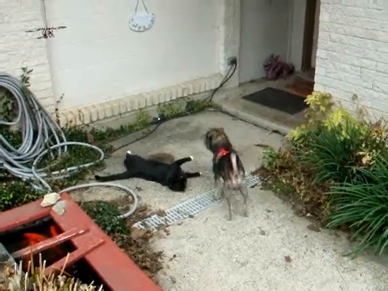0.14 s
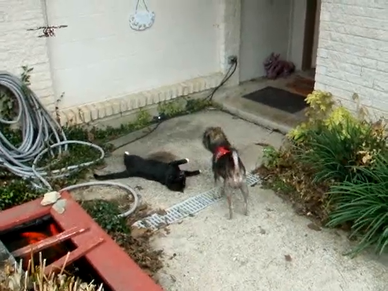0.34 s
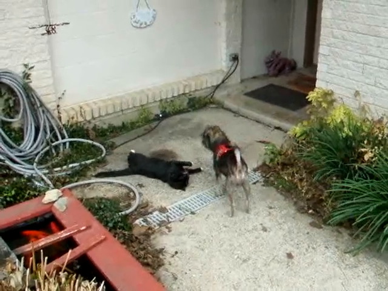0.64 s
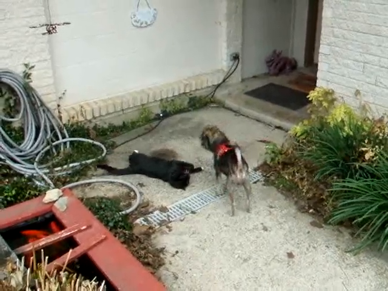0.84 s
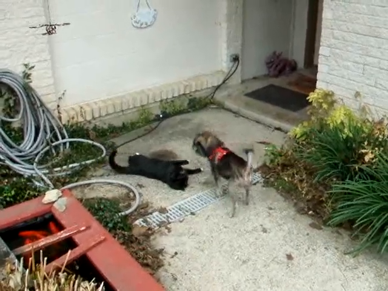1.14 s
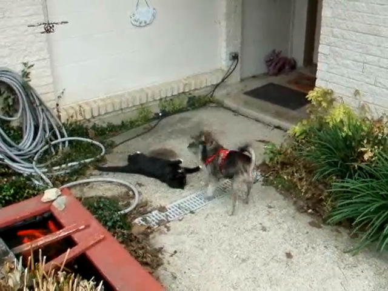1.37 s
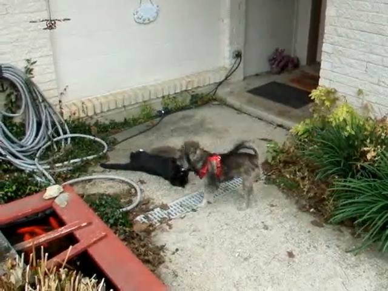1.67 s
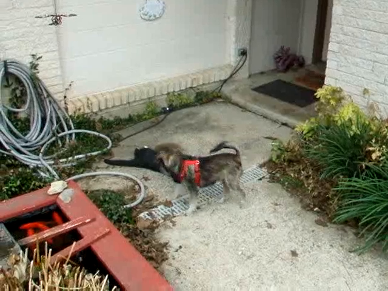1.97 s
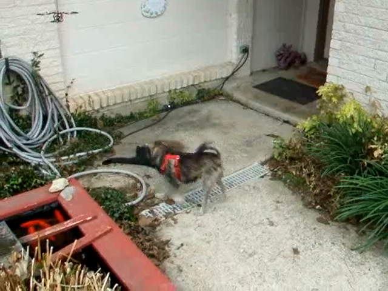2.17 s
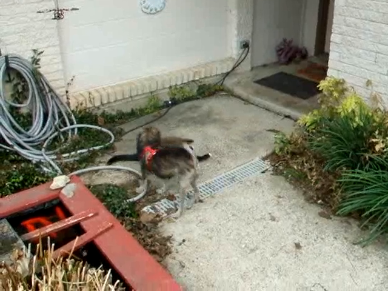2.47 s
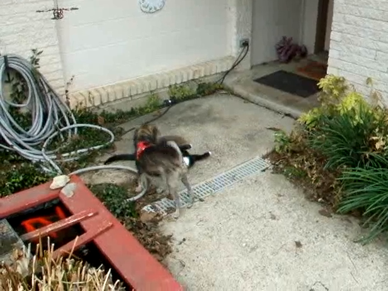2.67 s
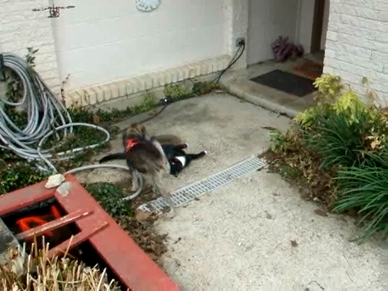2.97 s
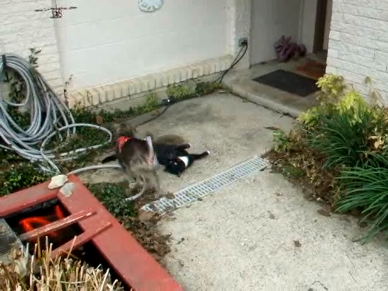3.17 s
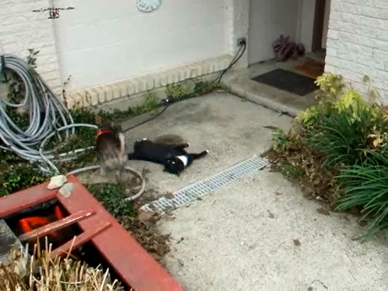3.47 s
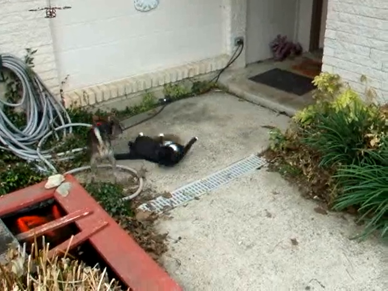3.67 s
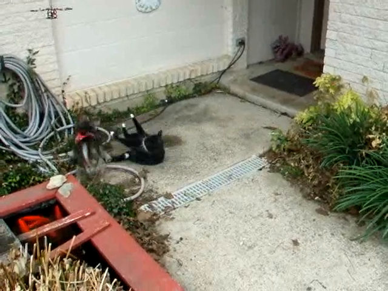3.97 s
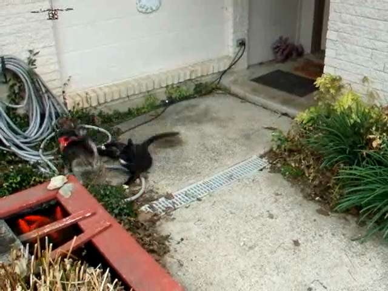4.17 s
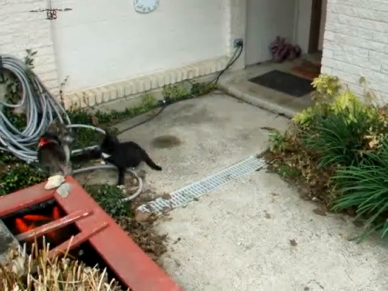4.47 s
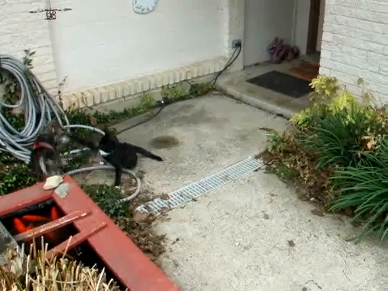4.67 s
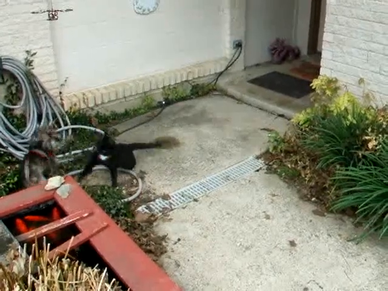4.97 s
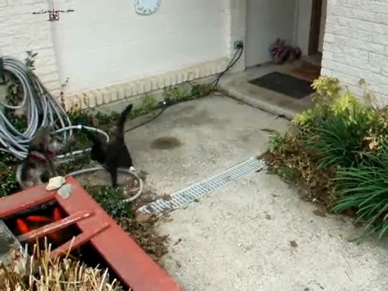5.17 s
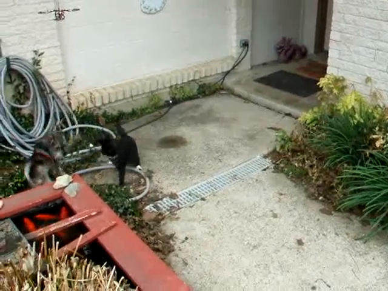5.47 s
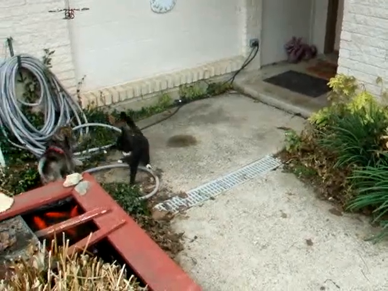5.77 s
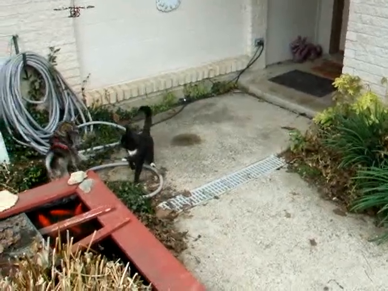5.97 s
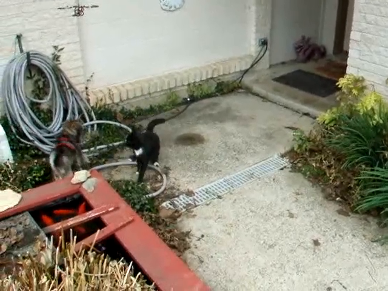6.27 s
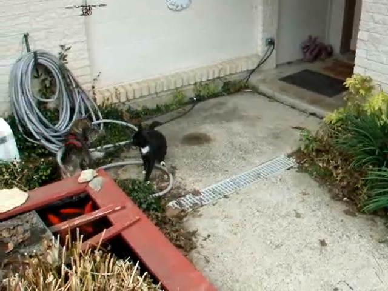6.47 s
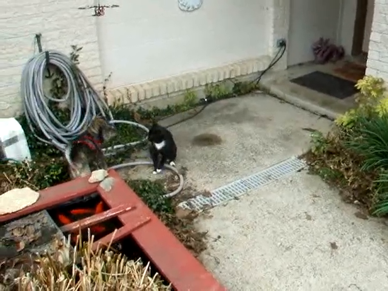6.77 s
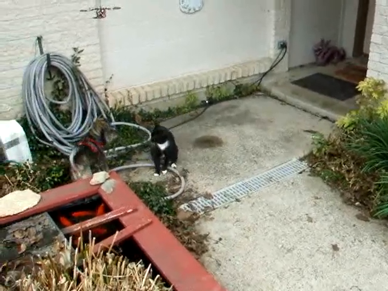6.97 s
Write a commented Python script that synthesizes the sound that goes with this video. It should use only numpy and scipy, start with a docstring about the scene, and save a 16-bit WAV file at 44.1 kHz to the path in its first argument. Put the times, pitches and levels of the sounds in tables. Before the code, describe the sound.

Crisp leaf crunches, rustling and claw taps from pets playing on a patio, with two rising bird whistles and a low traffic hum.

```python
"""Distant traffic and a motor hum are heard first, with leaves stirring on a walled concrete patio.
A small dog and a cat play there: paws tap and scuff, then crunch through dry leaves and low plants,
each crunch a cloud of tiny fractures. A crow caws far off and a bird gives two long rising whistles,
harmonic tones that echo among the houses. There is one soft hoot and there are two short chips.
A far exhaust swells now and then, and at the end a vehicle draws nearer."""
import sys
import numpy as np
from scipy import signal
from scipy.io import wavfile

SR = 44100
rng = np.random.default_rng(int(sys.argv[2]) if len(sys.argv) > 2 else 0)


def file_out(sig):
    """Save sig as 16-bit WAV at sys.argv[1]."""
    # one column per channel
    cols = np.atleast_2d(sig).T
    # limit, then scale
    lim = np.clip(cols, -1, 1)
    pcm = np.round(lim * 32767).astype(np.int16)
    wavfile.write(sys.argv[1], SR, pcm)


N = 314212
TIME = np.arange(N) / SR


def from_db(db):
    """Amplitude grows tenfold for every 20 dB."""
    return 10 ** (np.asarray(db) / 20)


def unit_power(x):
    """Normalisation by the root mean square."""
    return x / np.sqrt(np.mean(x ** 2) + 1e-20)


def curve(rows):
    """Linear interpolation of (time_s, value) rows at every sample."""
    return np.interp(TIME, *np.transpose(rows))


def swell(centre_s, db, half_length_s):
    """Gaussian envelope: the gain is 1/e of its peak one half length from the centre."""
    return from_db(db) * np.exp(-np.minimum(((TIME - centre_s) / half_length_s) ** 2, 20))


def burst(peak_s, db, rise_s, decay_s):
    """Transient envelope: exponential growth to a peak, then exponential decay."""
    fall = np.maximum(2 * (peak_s - TIME) / rise_s, (TIME - peak_s) / decay_s)
    return from_db(db) * np.exp(-np.minimum(fall, 20))


def drift(rate_hz):
    """Random modulation: low-passed noise of unit power, computed at every 40th sample."""
    pole = np.exp(-2 * np.pi * rate_hz * 40 / SR)
    white = rng.standard_normal(N // 40 + 2002)
    slow = signal.lfilter([1], [1, -2 * pole, pole * pole], white)[2000:]
    return np.interp(np.arange(N) / 40, np.arange(len(slow)), unit_power(slow))


def phase_of(hz):
    """Phase is the time integral of frequency."""
    return 2 * np.pi * np.cumsum(hz) / SR


def coloured(x, spectrum, size=8192):
    """Minimum-phase filtering to a spectral shape; white noise keeps its power."""
    hz, db = np.transpose(spectrum)
    grid_hz = np.maximum(np.abs(np.fft.fftfreq(size, 1 / SR)), 1)
    rolloff_db = 40 * np.log2(np.maximum(grid_hz / hz[-1], 1))
    log_gain = np.log(from_db(np.interp(np.log(grid_hz), np.log(hz), db) - rolloff_db))
    response = np.fft.ifft(np.exp(np.conj(signal.hilbert(log_gain)))).real[:size // 2]
    return signal.fftconvolve(x, response / np.linalg.norm(response))[:N]


def noise(spectrum):
    """Stationary Gaussian noise of unit power and given spectral shape."""
    return coloured(rng.standard_normal(N), spectrum)


def grains(per_s, spread_db):
    """Shot noise of unit power: tiny fractures of uneven size at random moments."""
    sizes = from_db(spread_db * np.minimum(rng.exponential(1, N), 4)) * rng.choice([-1, 1], N)
    return unit_power(sizes * (rng.random(N) < per_s / SR))


def resonate(x, hz, width_hz):
    """A damped two-pole resonator: the wider its band, the shorter it rings."""
    radius, angle = np.exp(-np.pi * width_hz / SR), 2 * np.pi * hz / SR
    return signal.lfilter([1, 0, -1], [1, -2 * radius * np.cos(angle), radius ** 2], x)


def echoes(x, t60_s, gap_s, per_s):
    """Reverberation: random reflections of unit total energy start after a gap and die away."""
    t = TIME[:SR]
    reflections = rng.standard_normal(SR) * (rng.random(SR) < per_s / SR)
    response = reflections * (t > gap_s) * from_db(-60 * t / t60_s)
    return signal.fftconvolve(x, response / (np.linalg.norm(response) + 1e-12))[:N]


# Spectra of the traffic's rumble and wash: frequency_hz, relative_density_db
RUMBLE_SPECTRUM = [(10, 5), (20, -1), (38, -11.5), (50, -8), (64, 2.5), (80, -2), (97, -3), (116, -2.5),
                   (150, -10), (200, -22), (300, -28.5)]
WASH_SPECTRUM = [(60, -2), (150, -2), (220, 0), (255, -1.5), (285, 4), (350, 0.5), (450, -3), (700, -4),
                 (1100, -7.5), (1700, -8), (2800, -12), (4500, -13.5), (7400, -17.5), (8000, -26)]
# Course of the rumble: time_s, level_db
RUMBLE_LEVELS = [(0, -42), (2.15, -46.5), (2.6, -43), (3.2, -48.5), (3.9, -45.5), (4.5, -51.5), (5.3, -49),
                 (5.7, -50.5), (7.12, -49)]

def traffic(wash_db=-47):
    """Distant vehicles add incoherently into noise: a varying rumble under a steady broadband wash."""
    rumble = from_db(curve(RUMBLE_LEVELS)) * noise(RUMBLE_SPECTRUM)
    return rumble + from_db(wash_db) * noise(WASH_SPECTRUM)


# Harmonics of the idling motor: multiple_of_firing_rate, relative_level_db
MOTOR_HARMONICS = [(5, -15), (6, -15), (7, -2), (8, -3.5), (9, -11.5)]

def motor(firing_hz=22.7, sag_hz_per_s=.155, start_db=-50, fade_db_per_s=.77):
    """Periodic firing gives harmonics; each wanders in level and phase on its way between the houses."""
    phase = phase_of(firing_hz - sag_hz_per_s * TIME)
    level_db = start_db - fade_db_per_s * TIME
    out = np.zeros(N)
    for order, db in MOTOR_HARMONICS:
        gain = from_db(level_db + db + 2.1 * drift(1.4))
        out += gain * np.sin(order * phase + 1.6 * drift(1.04))
    return np.sqrt(2) * out


def mains_hum(pitch_hz=239.3, level_db=-62.5):
    """Vibration forced by the mains gives a faint, steady pure tone."""
    return np.sqrt(2) * from_db(level_db) * np.sin(2 * np.pi * pitch_hz * TIME)


# Spectra of brittle leaf blades and of stems and soil: frequency_hz, relative_density_db
LEAF_SPECTRUM = [(300, -36), (1000, -25.5), (2000, -18.5), (3000, -18.5), (4000, -11), (5000, 3),
                 (5600, -1), (6500, 2.5), (7350, 4), (8000, -5)]
STEM_SPECTRUM = [(200, -28.5), (550, -20), (850, -4.5), (1200, -9), (1800, 1.5), (2500, -3.5), (3500, 1),
                 (4200, -1), (6000, -2), (8000, -14.5)]
# Leaves stirring under the animals between steps: time_s, level_db
STIR_LEVELS = [(0, -57), (.6, -60.5), (1.3, -61), (2.6, -57.5), (3.05, -58.5), (4.6, -50), (5.5, -56.5),
               (5.8, -51), (6.05, -60), (7.12, -59.5)]
# Fur and legs brushing through plants: centre_s, level_db, half_length_s
PLANT_BRUSHES = [(1.159, -50, 0.014), (1.472, -55, 0.042), (1.68, -50.5, 0.019), (1.812, -48, 0.047),
                 (3.314, -50, 0.026), (3.398, -38.5, .012), (3.571, -43, 0.036), (3.738, -49.5, 0.015),
                 (3.92, -55, 0.16), (4.219, -40, 0.062), (4.367, -41.5, 0.041), (4.527, -42.5, 0.12),
                 (4.65, -40.5, 0.031), (4.782, -44, 0.035), (5, -44.5, 0.056), (5.131, -36, 0.097)]

def rustle(crackle_db=-4.5, shake_db=-23):
    """Friction: leaves slide over each other in clumps of grains, and dry edges catch and crack."""
    power = from_db(curve(STIR_LEVELS)) ** 2 + sum(swell(*row) ** 2 for row in PLANT_BRUSHES)
    # each snap shakes the leaves around it
    power += sum(burst(s, db + shake_db, rise_s=.0066, decay_s=.027) ** 2 for s, db, _ in DRY_SNAPS)
    blades = coloured(grains(per_s=3700, spread_db=1.5), LEAF_SPECTRUM)
    stems = coloured(grains(per_s=3000, spread_db=1), STEM_SPECTRUM)
    edges = coloured(grains(per_s=110, spread_db=2), LEAF_SPECTRUM)
    clumps = from_db(2.03 * drift(29))
    texture = from_db(-2 + 1.8 * drift(12)) * blades + from_db(-2) * stems + from_db(crackle_db) * edges
    return np.sqrt(power) * clumps * texture


# Brittle snaps and claw ticks: start_s, level_db, pitch_hz
DRY_SNAPS = [(0.157, -23.5, 7100), (1.207, -26, 6460), (1.459, -26.5, 6300), (1.516, -24.5, 5760),
             (1.558, -24.5, 7100), (1.639, -27.5, 5140), (1.970, -26, 6840), (1.998, -24, 6360),
             (2.271, -22, 5370), (2.590, -20, 6460), (2.5928, -13.5, 6850), (2.6075, -27, 6400),
             (2.622, -17.5, 6500), (2.740, -28, 7300), (3.239, -25, 7100), (3.316, -22, 5860),
             (3.414, -14.5, 6630), (3.424, -15, 7170), (3.504, -16, 6070), (4.027, -10, 7260),
             (4.042, -16, 7200), (4.065, -15.5, 7500), (4.446, -19, 7260), (4.868, -16, 5900),
             (5.057, -21, 7240), (5.133, -23, 6430), (5.7, -27, 6600)]

def snaps(ring_t60_s=.0063, ring_db=-2, crack_t60_s=.0048, crack_db=2.5, size=1024):
    """Brittle fracture: a crack runs through a dry blade or twig and excites a brief free vibration."""
    cracks, rings, t = np.zeros(N), np.zeros(N), TIME[:size]
    ring_envelope = (1 - np.exp(-t / .0002)) * from_db(-60 * t / ring_t60_s)
    for start_s, db, hz in DRY_SNAPS:
        at = round(start_s * SR)
        tear = rng.standard_normal(size) * from_db(-60 * t / crack_t60_s)
        cracks[at:at + size] += from_db(db + crack_db) * tear / np.linalg.norm(tear)
        rings[at:at + size] += from_db(db + ring_db) * ring_envelope * np.sin(2 * np.pi * hz * t)
    return coloured(cracks, LEAF_SPECTRUM) + rings


# Calls of a far crow: centre_s, half_length_s, level_db, pitch_hz
CROW_CAWS = [(0.427, .085, -51.5, 506), (0.991, 0.13, -53.5, 506), (2.05, 0.1, -53.5, 499),
             (4.997, 0.046, -50.5, 500), (5.538, 0.053, -46.5, 508), (6.28, 0.072, -53, 495)]

def caws():
    """Jitter and shimmer make an arched call hoarse; at this distance its third harmonic carries best."""
    out = np.zeros(N)
    jitter, shimmer = 1 + .04 * drift(220), from_db(3 * drift(90))
    for centre_s, half_length_s, db, hz in CROW_CAWS:
        sounding = np.abs(TIME - centre_s) < half_length_s
        position = (TIME[sounding] - centre_s) / half_length_s
        phase = phase_of(hz * jitter[sounding] * (1 - .15 * position ** 2))
        voice = np.sin(3 * phase) + from_db(-5.5) * np.sin(4 * phase) + from_db(-7.5) * np.sin(6 * phase)
        out[sounding] += from_db(db) * np.cos(np.pi * position / 2) ** 2 * voice
    return np.sqrt(2) * shimmer * out


# Paws and claws on concrete, drain grate and hose: start_s, peak_db, pitch_hz, contact_t60_s
PAW_TAPS = [(0.534, -35, 2900, 0.019), (1.513, -29, 1740, 0.028), (1.514, -34, 520, 0.037),
            (1.515, -37, 3200, 0.0205), (1.640, -38.5, 1300, .02), (3.172, -23, 3200, 0.0062),
            (3.172, -28, 1800, 0.013), (3.195, -30.5, 370, 0.02), (3.195, -41, 1200, 0.021),
            (3.853, -28.5, 3600, 0.054), (3.854, -33, 2060, 0.08), (6.591, -38, 1420, .05)]

def taps(relative_bandwidth=.26, size=8192):
    """Impact excitation: a short gritty contact drives one broad, heavily damped resonance."""
    out, t = np.zeros(N + size), TIME[:size]
    for start_s, db, hz, t60_s in PAW_TAPS:
        contact = rng.standard_normal(size) * from_db(-60 * t / t60_s)
        knock = resonate(contact, hz, relative_bandwidth * hz)
        at = round(start_s * SR)
        out[at:at + size] += from_db(db) * knock / np.abs(knock).max()
    return out[:N]


# Swells of a far exhaust note: centre_s, level_db, half_length_s
EXHAUST_SWELLS = [(1.0, -43, 0.089), (1.818, -43.5, 0.13), (2.5, -57, 0.27)]

def exhaust(pitch_hz=79.7, floor_db=-56.5):
    """Amplitude modulation: a low, wavering exhaust tone swells above a steady floor."""
    power = from_db(floor_db) ** 2 + sum(swell(*row) ** 2 for row in EXHAUST_SWELLS)
    return np.sqrt(2 * power) * np.sin(phase_of(pitch_hz * (1 + .0383 * drift(8.8))))


# Pitch glides of the bird, one list per whistle: time_s, pitch_hz
WHISTLE_GLIDES = [
    [(2.12, 1197), (2.21, 1362), (2.32, 1630), (2.45, 1778), (2.60, 2016), (2.70, 2170), (2.835, 2470),
     (2.905, 2353)],
    [(5.25, 1365), (5.37, 1674), (5.50, 1860), (5.63, 2074), (5.71, 2283), (5.79, 2564), (5.86, 2705),
     (5.91, 2700), (5.965, 2590)],
]

def whistles(attack_s=.1, release_s=.095, ground_lag_s=.00508, ground_db=-10.5):
    """Interference: as a fluttering tone climbs an octave, its ground echo adds and cancels in turn."""
    # the tone starts reedy, led by its second harmonic, and grows pure and loud as it rises
    full_hz, full_db, swell_db_per_octave = 2210, -42.5, 22.5
    reedy_hz, reedy_db, fade_db_per_octave = 1550, -50, 27
    out = np.zeros(N)
    for glide in WHISTLE_GLIDES:
        hz = curve(glide)
        start_s, end_s = glide[0][0], glide[-1][0]
        envelope = np.clip(np.minimum((TIME - start_s) / attack_s, (end_s - TIME) / release_s), 0, 1)
        fundamental_db = full_db + swell_db_per_octave * np.minimum(np.log2(hz / full_hz), 0)
        overtone_db = reedy_db - fade_db_per_octave * np.abs(np.log2(hz / reedy_hz))
        comb_gain = np.abs(1 + from_db(ground_db) * np.exp(2j * np.pi * hz * ground_lag_s))
        phase = phase_of(hz * (1 + .004 * drift(50)))
        overtones = np.sin(2 * phase + .9 * drift(110)) + from_db(-16) * np.sin(3 * phase)
        tone = from_db(fundamental_db) * comb_gain * np.sin(phase) + from_db(overtone_db) * overtones
        out += envelope * tone * from_db(2.8 * drift(45))
    return np.sqrt(2) * out


# Paws crushing dry leaves: peak_s, level_db, rise_s, relative_stem_db, blade_pitch_hz
LEAF_CRUNCHES = [(2.586, -19.5, 0.0032, -17, 7270), (3.412, -22, 0.0077, -25, 7370),
                 (3.475, -23, .002, -16, 5300), (3.509, -24, 0.029, 0.5, 6040),
                 (4.029, -35, .0064, -10, 7200), (4.037, -33, 0.013, -9, 3700),
                 (4.067, -31, .0033, -15, 7400), (4.167, -32.5, 0.007, -13, 6700),
                 (4.253, -35, 0.015, -11, 6840), (4.334, -37.5, .002, -10, 5030),
                 (4.462, -31.5, 0.024, -6.5, 7280), (4.576, -37, 0.01, -3, 5030),
                 (4.627, -37, .009, 3.5, 6600), (4.78, -42, 0.021, 0, 5000), (5.157, -37, .022, -1, 7400)]

def crunches(decay_s=.014, ring_db=-6, ring_width_hz=170, splinter_db=-13):
    """Acoustic emission: a step breaks many leaves, rings one blade and scrapes the stems below."""
    blade_power, stem_power, rings = np.zeros(N), np.zeros(N), np.zeros(N)
    fractures = grains(per_s=2100, spread_db=-1)
    for peak_s, db, rise_s, stem_db, hz in LEAF_CRUNCHES:
        force = burst(peak_s, db, rise_s, decay_s)
        blade_power += force ** 2
        stem_power += (force * from_db(stem_db)) ** 2
        rings += force * unit_power(resonate(fractures, hz, ring_width_hz))
    splinters = grains(per_s=160, spread_db=1)
    breaks = grains(per_s=6000, spread_db=4) + from_db(splinter_db) * splinters
    blades = np.sqrt(blade_power) * coloured(breaks, LEAF_SPECTRUM)
    stems = np.sqrt(stem_power) * coloured(grains(per_s=5000, spread_db=-.5), STEM_SPECTRUM)
    return blades + from_db(ring_db) * rings + stems


def short_call(centre_s, half_length_s, db, hz, octaves_per_s, jitter):
    """Frequency modulation: one short note glides while random jitter roughens its pitch."""
    offset_s = np.clip(TIME - centre_s, -2 * half_length_s, 2 * half_length_s)
    pitch_hz = hz * 2 ** (octaves_per_s * offset_s) * (1 + jitter * drift(300))
    return np.sqrt(2) * swell(centre_s, db, half_length_s) * np.sin(phase_of(pitch_hz))


def hoot():
    """Nearly periodic vibration gives a soft, almost pure note that sinks a little in pitch."""
    return short_call(3.305, half_length_s=.032, db=-40.5, hz=727, octaves_per_s=-.6, jitter=.0047)


# Short bird chips: centre_s, half_length_s, level_db, pitch_hz, glide_octaves_per_s
BIRD_CHIPS = [(3.833, 0.0077, -39.5, 2530, -12), (6.593, 0.0094, -40.5, 3230, 5)]

def chips():
    """Spectral broadening: strong jitter turns each brief, steep glide into a rasp."""
    return sum(short_call(*row, jitter=.06) for row in BIRD_CHIPS)


# Spectrum of the approaching vehicle: frequency_hz, relative_density_db
VEHICLE_SPECTRUM = [(80, -18), (125, -8), (142, -6), (154, -4.5), (168, -12.5), (192, -5.5), (215, -17),
                    (320, -39)]
# Course of its approach: time_s, level_db
VEHICLE_LEVELS = [(0, -68), (6.3, -54.5), (6.6, -50.5), (6.8, -42.5), (7.0, -40.5), (7.12, -43)]

def approaching_vehicle():
    """Level rises as distance shrinks: a low band of noise grows as a vehicle draws nearer."""
    return from_db(curve(VEHICLE_LEVELS)) * noise(VEHICLE_SPECTRUM)


def among_houses(x):
    """Multiple reflection: near walls blur a call, and a farther front returns it a moment later."""
    near = echoes(x, t60_s=.45, gap_s=.008, per_s=150)
    far = echoes(x, t60_s=.45, gap_s=.12, per_s=200)
    return x + from_db(-8) * near + from_db(-15) * far


def scene():
    """Superposition: animals between the patio walls, birds among the houses and the background add."""
    play = crunches() + rustle() + snaps() + taps()
    patio_echoes = from_db(-10) * echoes(play, t60_s=.2, gap_s=.005, per_s=2500)
    birds = among_houses(whistles() + chips() + caws()) + hoot()
    background = traffic() + approaching_vehicle() + motor() + exhaust() + mains_hum()
    return (play + patio_echoes + birds + background)[None]


def record(dry, cutoff_hz=7900):
    """Band limiting: a small microphone acts as a steep low-pass filter."""
    return signal.sosfilt(signal.ellip(10, .2, 70, cutoff_hz, fs=SR, output="sos"), dry)


dry = scene()
out = record(dry)
file_out(out)
```